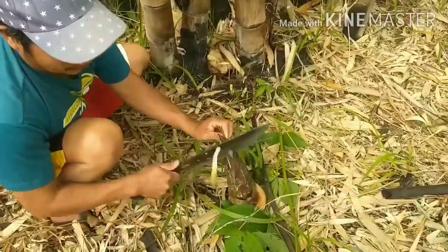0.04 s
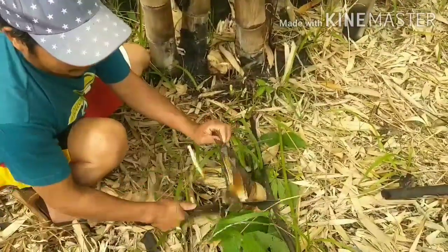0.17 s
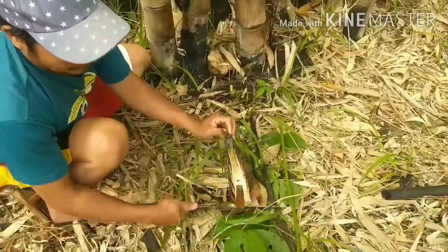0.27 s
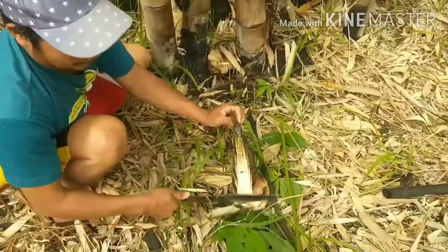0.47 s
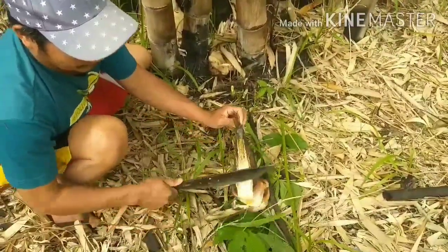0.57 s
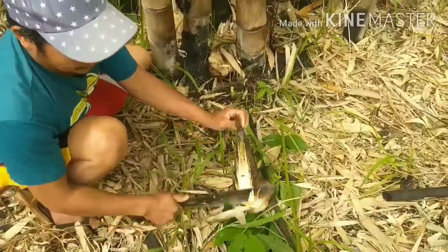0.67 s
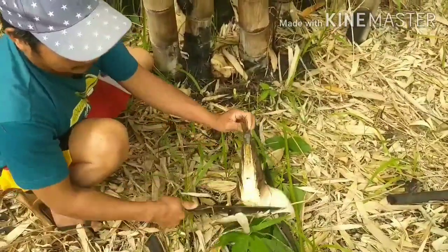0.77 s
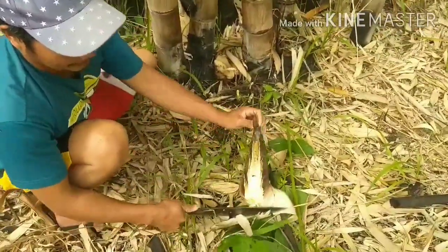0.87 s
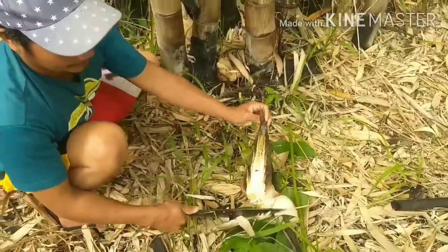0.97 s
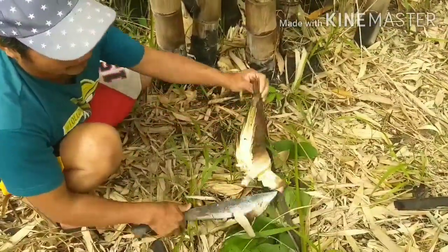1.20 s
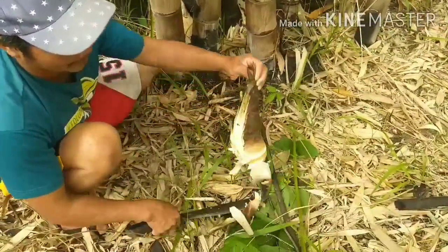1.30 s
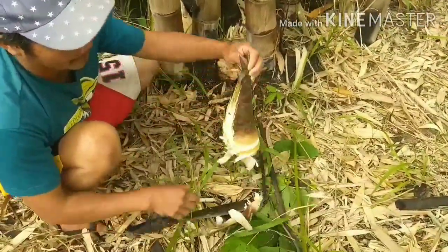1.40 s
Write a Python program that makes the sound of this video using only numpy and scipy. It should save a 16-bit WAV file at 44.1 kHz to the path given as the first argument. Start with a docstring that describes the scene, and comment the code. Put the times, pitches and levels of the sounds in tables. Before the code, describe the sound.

Close outdoors, faint rustling and light metallic ticks lead to a hard crunchy chop through fibrous husk, trailing crackles, then a softer slicing stroke with singing steel, and small leafy crackles as the shoot is lifted.

```python
"""A long steel blade chops twice into a bamboo shoot lying on dry leaf litter, then the shoot is lifted.
Fibres tear as random clicks over hiss, shaped by drawn levels; the soft core crunches and thuds below.
Single fibres snap as short gritty rings with treble cracks, and the hollow husk resounds as filtered noise.
The touched blade rings in four decaying modes and sings under a noise rub in the second cut.
Behind lie a faint open-air hiss and a low rumble, all heard through two close ports."""
import sys
import numpy as np
from scipy import signal
from scipy.fft import rfft, irfft, next_fast_len
from scipy.io import wavfile
from scipy.ndimage import map_coordinates

SR = 44100
rng = np.random.default_rng(int(sys.argv[2]) if len(sys.argv) > 2 else 0)


def transcribe(signal):
    """Save signal, clipped to [-1, 1], as a 16-bit WAV file at the path in sys.argv[1]."""
    frames = np.atleast_2d(signal).T
    limited = np.clip(frames, -1, 1)
    pcm = np.round(limited * 32767).astype(np.int16)
    wavfile.write(sys.argv[1], SR, pcm)


def rack_gain(trim_db):
    """Turn a fader trim in dB into the linear factor to multiply a signal by."""
    fader = np.asarray(trim_db, float)
    return 10 ** (fader / 20)


N = 63945  # samples, 1.45 s


def unit(x):
    """Scaled to rms 1."""
    return x / np.sqrt(np.mean(x ** 2) + 1e-20)


def filtered(x, response):
    """x passed through a complex response of frequency."""
    m = next_fast_len(N + 8192)
    return irfft(rfft(x, m) * response(np.fft.rfftfreq(m, 1 / SR)), m)[..., :N]


def coloured(x, points):
    """x through a (frequency [Hz], gain [dB]) curve read on a log axis, rms 1."""
    f, v = np.transpose(points)

    def gain(hz):
        return rack_gain(np.interp(np.log(hz + 1), np.log(f + 1), v, left=-120, right=v[-1]))

    return unit(filtered(x, gain))


def resonance(c_hz, width_hz):
    """One causal resonance of peak gain 1."""
    return lambda f: 1j * f * width_hz / (c_hz ** 2 - f * f + 1j * f * width_hz + 1e-9)


def wobble(rate):
    """A smooth random curve, rate knots a second."""
    knots = rng.standard_normal(200 + int(N / SR) * 800)
    return map_coordinates(knots, [np.arange(N) * rate / SR])


def curves(rows):
    """One value per sample for each column after the time."""
    s, *cols = np.transpose(rows)
    return [np.interp(np.arange(N) / SR, s, c) for c in cols]


def gated_curve(rows):
    """A level curve in dB, at -120 outside its rows."""
    s, db = np.transpose(rows)
    return np.interp(np.arange(N) / SR, s, db, left=-120, right=-120)


HISS_DB = 3  # hiss against the rms of the clicks


def crackle(lo_hz, hi_hz, per_s, spread_db, sharp, count):
    """Random fibre clicks ring a few cycles in one of count resonances, over a hiss."""
    out = np.zeros(N)
    for c in np.geomspace(lo_hz, hi_hz, count):
        fires = rng.random(N) < per_s / count / SR
        sign = np.sign(rng.standard_normal(N))
        strength = rack_gain(spread_db * np.minimum(rng.exponential(1, N), 4))
        clicks = unit(fires * sign * strength)
        ring = resonance(c, c / sharp)
        ringing = filtered(filtered(clicks, ring), ring)
        out += ringing / np.sqrt(c / hi_hz) ** 0.11  # slightly stronger low down
    return unit(out) + rack_gain(HISS_DB) * rng.standard_normal(N)


# Husk and leaves tearing: (time [s], tearing level [dB], treble level [dB])
TEARING_LEVELS = [(0, -49.5, -51), (.02, -49, -52.5), (.045, -51, -51.5), (.075, -50, -51),
                  (.095, -53.5, -56), (.115, -60.5, -44), (.128, -62, -60), (.137, -77, -64),
                  (.165, -60, -47.5), (.193, -49, -48), (.195, -41.5, -47.5), (.2035, -42, -26),
                  (.2055, -29, -13.5), (.210, -8.5, -13), (.216, -18, -21.5), (.224, -12.5, -11.5),
                  (.236, -16.5, -19), (.240, -27, -25), (.27, -25.5, -31), (.30, -32, -32),
                  (.342, -35, -36.5), (.365, -34.5, -35), (.406, -35.5, -32), (.422, -40, -37),
                  (.430, -45.5, -41.5), (.448, -38.5, -36.5), (.472, -46, -45), (.505, -47, -48.5),
                  (.512, -44, -45), (.57, -48, -46.5), (.60, -49, -49), (.638, -49.5, -50),
                  (.662, -53, -52), (.673, -51, -55), (.676, -42, -40), (.692, -37, -52),
                  (.694, -36, -28.5), (.710, -26.5, -29), (.718, -25, -20), (.735, -27.5, -28.5),
                  (.748, -31, -26), (.760, -24, -27), (.766, -33, -31), (.80, -34, -36), (.83, -36, -37),
                  (.88, -44.5, -44), (.91, -39, -41), (.98, -50, -51.5), (1.0, -45, -45),
                  (1.09, -47, -44.5), (1.15, -49.5, -48), (1.24, -51, -48), (1.26, -42, -35),
                  (1.295, -47, -43), (1.32, -39, -37.5), (1.38, -38, -33.5), (1.41, -42.5, -44),
                  (1.45, -48.5, -41.5)]
# Tone of the tearing body, also of the grit in the snaps: (frequency [Hz], gain [dB])
TEARING_TONE = [(710, -23), (1200, -21), (1370, -15.5), (1650, -17), (1980, -9), (2320, -8), (3390, -0.5),
                (4440, 0), (4830, 1), (5970, -7.5), (6500, -17), (8450, -22), (14300, -120)]
# Tone of the tearing treble, also of the cracks in the snaps: (frequency [Hz], gain [dB])
TREBLE_TONE = [(3530, -18), (6000, -10.5), (6560, -4), (8480, 3), (10100, -5), (11700, 1), (15200, -8.5)]
# Soft core giving way: (time [s], crunch level [dB], thud level [dB])
CORE_LEVELS = [(0.0, -65, -89), (0.044, -67, -78), (0.052, -54, -69), (0.116, -76, -93), (0.188, -74, -87),
               (0.21, -46, -84), (0.222, -28, -54), (0.254, -36, -40.5), (0.302, -42.5, -55.5),
               (0.366, -43, -62.5), (0.424, -54, -67.5), (0.436, -46.5, -76), (0.452, -55, -81),
               (0.468, -58, -85), (0.552, -59.5, -79), (0.666, -88, -84), (0.69, -70, -82),
               (0.722, -49, -79), (0.746, -50, -77), (0.754, -37, -61.5), (0.79, -46, -46.5),
               (0.814, -46, -64), (0.826, -47, -60), (0.848, -57, -64), (0.98, -62, -86),
               (1.054, -61.5, -76.5), (1.174, -71.5, -83), (1.292, -59.5, -78), (1.324, -55.5, -73),
               (1.45, -62.5, -88)]
# Tone of the crunch: (frequency [Hz], gain [dB])
CRUNCH_TONE = [(290, -45), (500, -16.5), (1110, -2), (1200, -8.5), (2000, 1), (2600, -41), (4400, -120)]
# Tone of the thud: (frequency [Hz], gain [dB])
THUD_TONE = [(35, -39), (60, -4), (102, -1), (171, -5), (291, 0.5), (600, -5.5), (780, -42), (1320, -120)]
# Hollow husk resounding in the cuts: (time [s], level [dB])
HOLLOW_LEVELS = [(.205, -58), (.210, -18), (0.226, -16.5), (.238, -34), (.25, -42), (.30, -70),
                 (0.673, -70), (0.675, -29.5), (0.693, -50), (0.694, -28.5), (.72, -32), (.745, -31.5),
                 (.762, -24.5), (.775, -35.5), (.80, -57)]
HOLLOW_HZ, HOLLOW_WIDTH_HZ = 3400, 740  # the resonance, passed twice


def tearing():
    """Husk and leaves tear in clumps, the core crunches and thuds below, and the hollow husk resounds."""
    level_db, treble_db = curves(TEARING_LEVELS)
    crunch_db, thud_db = curves(CORE_LEVELS)
    clumps = 0.5 * wobble(59.4) + 0.81 * wobble(250)  # dB, shared by all but the thud

    mid = coloured(crackle(1297, 6600, 3500, 1.6, 5.2, count=12), TEARING_TONE)
    mid = mid * rack_gain(level_db + clumps + 0.27 * wobble(119.1))
    top = coloured(crackle(6330, 14840, 5000, 2.6, 6.4, count=10), TREBLE_TONE)
    top = top * rack_gain(treble_db + clumps + 0.42 * wobble(150))

    crunch = coloured(crackle(501, 2070, 600, 1.5, 1.9, count=5), CRUNCH_TONE)
    crunch = crunch * rack_gain(crunch_db + 0.85 * clumps + 0.53 * wobble(90))
    thud = coloured(rng.standard_normal(N), THUD_TONE) * rack_gain(thud_db + 0.86 * wobble(71.35))

    body = resonance(HOLLOW_HZ, HOLLOW_WIDTH_HZ)
    hollow = unit(filtered(rng.standard_normal(N), lambda f: body(f) ** 2))
    hollow = hollow * rack_gain(gated_curve(HOLLOW_LEVELS) + clumps)
    return mid + top + crunch + thud + hollow


# Single fibres snapping, levels before the trims in snaps():
# (time [s], ring level [dB], pitch [Hz], crack level [dB], t60 [s])
FIBRE_SNAPS = [(0.0538, -10.5, 3366, -12.5, 0.015), (0.1952, -30, 4660, -26, 0.0088),
               (0.202, -35, 4600, -24, .008), (0.2216, -10, 3500, -6, 0.0027),
               (.2375, -0.5, 3660, -7, 0.002), (0.2944, -10, 4680, -21, 0.032),
               (0.3284, -15, 1840, -33, 0.0047), (0.3617, -16, 3400, -16, 0.015),
               (0.3897, -16.5, 5460, -24, 0.012), (0.4033, -16.5, 4100, -13.5, 0.0048),
               (0.4339, -20.5, 3140, -22, .012), (0.4421, -12.5, 3450, -21, 0.012),
               (0.5067, -33, 4240, -20, 0.022), (0.521, -45, 3800, -27, 0.009),
               (.5592, -25, 3460, -22.5, 0.0052), (0.5966, -45, 5000, -21.5, 0.0053),
               (.6190, -24.5, 3430, -26, 0.0054), (.7190, -20, 4000, -30, 0.0034),
               (.7515, -30, 3400, -24, 0.0034), (.7575, -23, 3300, -16, 0.0034),
               (0.8258, -16.5, 1590, -29.5, 0.0092), (.9050, -36, 3900, -21.5, .003),
               (0.9547, -34, 4740, -42, 0.0049), (0.9928, -24.5, 4500, -26, 0.0079),
               (0.9959, -38, 4470, -21, 0.0067), (1.2539, -37, 5060, -29, .005),
               (1.2725, -31, 4900, -30, 0.0044), (1.3246, -24.5, 4600, -18, 0.0039),
               (1.3800, -21, 3920, -28, 0.0055), (1.3830, -19.5, 3600, -19, 0.013),
               (1.42, -47, 3700, -12, 0.0022), (1.4330, -29, 3500, -28, .003)]
RING_SHARE = .8  # pitched part of a snap against its grit


def snaps():
    """A fibre parts: a short gritty ring at its pitch and a treble crack share one fast decay."""
    out, t = np.zeros(N + SR), np.arange(600) / SR
    crack = coloured(rng.standard_normal(N), TREBLE_TONE)
    grit = coloured(rng.standard_normal(N), TEARING_TONE)

    def peak(v):
        return v / np.abs(v).max()

    for s, db, hz, treble_db, t60 in FIBRE_SNAPS:
        i = round(s * SR)
        here = slice(i, i + len(t))
        fade = rack_gain(-60 * t / max(t60, .002)) * (1 - np.exp(-t / 0.00012))
        ring = RING_SHARE * np.sin(2 * np.pi * hz * t) + grit[here]
        out[here] += rack_gain(db - 5.0) * peak(fade * ring)
        out[here] += rack_gain(treble_db - 3.0) * peak(fade * crack[here])
    return out[:N]


# Modes of the steel blade: (frequency [Hz], t60 [s])
BLADE_MODES = [(7585, .09), (9245, .14), (10860, .09), (12500, .07)]
# Touches on the blade: (time [s], then the level of each of the four modes [dB])
BLADE_TOUCHES = [(.0235, -33.5, -61, -41, -50), (.0541, -33, -44, -48, -49), (.099, -43, -42, -52, -47),
                 (.158, -46, -58, -56, -48), (.572, -42, -58, -58, -58), (.605, -34, -54, -44, -54),
                 (.620, -44, -35.5, -63, -58), (.670, -42, -37, -48, -52)]
# The blade rubbed through the second cut: (time [s], rub noise level [dB])
RUB_LEVELS = [(0.67, -53), (0.71, -28.5), (0.726, -27), (0.79, -52)]
# How strongly the rub drives the modes: (gain of each of the four modes [dB])
RUB_GAINS = (24.4, 21.6, 13.5, 13)
TOUCH_RISE_S, WAVER_DB = .002, 3.5  # time constant of the onset, depth of the unsteadiness


def blade():
    """The steel rings unsteadily in its modes when touched, and sings under the rub of the cut."""
    out, t = np.zeros((len(BLADE_MODES), N + SR)), np.arange(SR // 4) / SR
    onset = 1 - np.exp(-t / TOUCH_RISE_S)
    for s, *levels in BLADE_TOUCHES:
        i = round(s * SR)
        phases = rng.random(len(BLADE_MODES))  # turns
        for k, ((hz, t60), turn) in enumerate(zip(BLADE_MODES, phases)):
            decay = rack_gain(levels[k] - 60 * t / t60)
            out[k, i:i + len(t)] += decay * onset * np.sin(2 * np.pi * (hz * t + turn))
    rings = sum(mode[:N] * rack_gain(WAVER_DB * wobble(130.6)) for mode in out)

    rub = rng.standard_normal(N) * rack_gain(gated_curve(RUB_LEVELS) + 1.9 * wobble(200))
    singing = sum(rack_gain(db) * filtered(rub, resonance(hz, 67))
                  for (hz, _), db in zip(BLADE_MODES, RUB_GAINS))
    return rings + singing


# Tone of the open-air hiss: (frequency [Hz], gain [dB])
HISS_TONE = [(240, -50), (400, -30), (1400, -18), (3200, -6), (7500, -3), (15200, -14)]
# Tone of the distant low rumble: (frequency [Hz], gain [dB])
RUMBLE_TONE = [(24, -37), (40, -7), (64, 0), (101, -7), (133, 1.5), (222, -13.5), (500, -30), (650, -53),
               (1100, -120)]
AIR_DB, RUMBLE_DB = -58, -75  # levels ahead of the low cut


def air():
    """Quiet outdoor floor: a faint steady noise hiss and a slowly wavering low noise rumble."""
    hiss = rack_gain(AIR_DB) * coloured(rng.standard_normal(N), HISS_TONE)
    rumble = rack_gain(RUMBLE_DB + 1.9 * wobble(11.8)) * coloured(rng.standard_normal(N), RUMBLE_TONE)
    return hiss + rumble


# Bands where the two ports differ:
# (frequency [Hz], half-width [Hz], side level against mid [dB], phase [rad])
PORT_BANDS = [(1897, 210, -10.5, 0.79), (9650, 870, -13, 2.2)]


def scene():
    """All sources, nearly mono; the ports differ in two bands."""
    mid = tearing() + snaps() + blade() + air()

    def difference(f):
        return sum(rack_gain(db) * np.exp(1j * turn - ((f - hz) / w) ** 4) for hz, w, db, turn in PORT_BANDS)

    side = filtered(mid, difference)
    return np.array([mid + side, mid - side])


def top_cut(x):
    """Nothing passes above the cut-off."""
    return signal.sosfilt(signal.butter(12, 16650, fs=SR, output="sos"), x)


CEILING = .85  # amplitude the soft overload approaches
LOW_CUT_HZ, TOP_HZ = 67, 15750


def record(dry):
    """Soft overload rounds the peaks, then a low cut and a steep top limit bound the band."""
    soft = dry / (1 + np.abs(dry / CEILING) ** 4) ** (1 / 4)

    def band(hz):
        return (hz < TOP_HZ) / np.sqrt(1 + (LOW_CUT_HZ / (hz + 1)) ** 6)

    mix = filtered(soft, band)
    return top_cut(mix)


dry = scene()
out = record(dry)
transcribe(out)
```